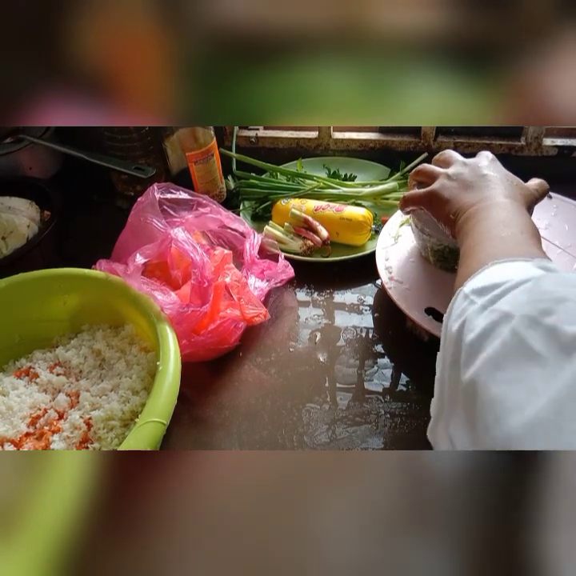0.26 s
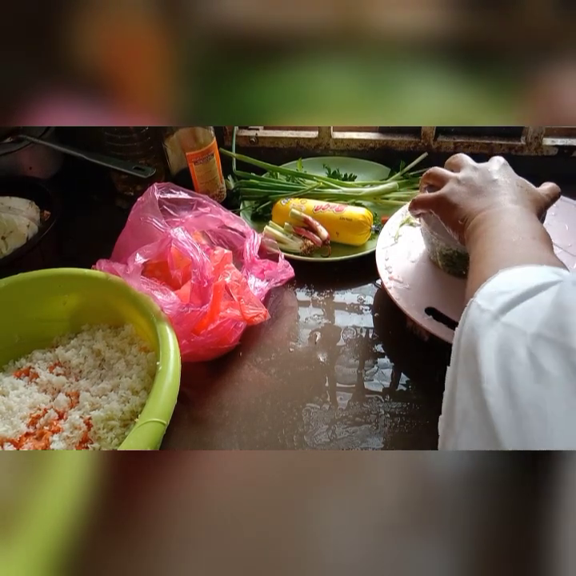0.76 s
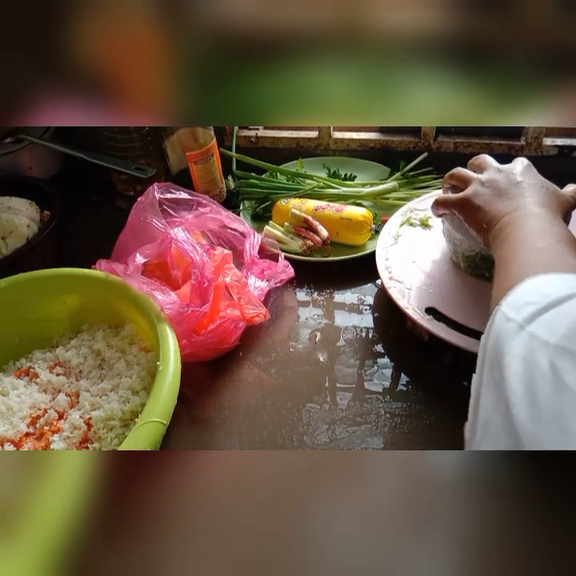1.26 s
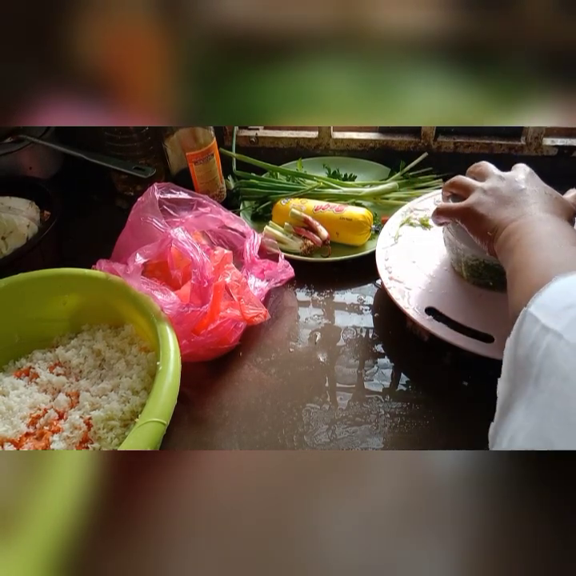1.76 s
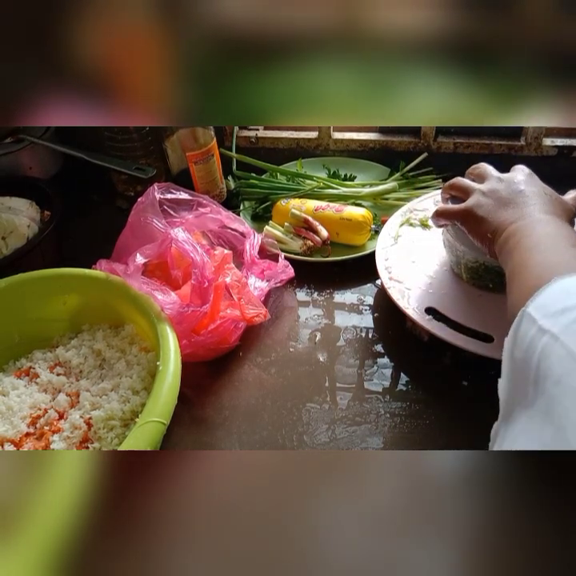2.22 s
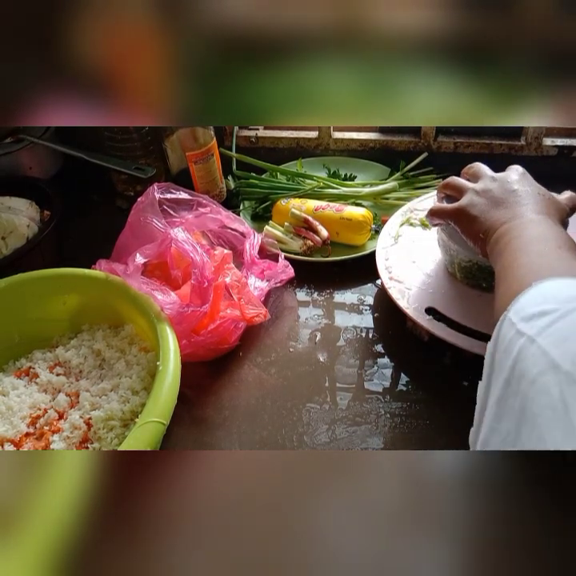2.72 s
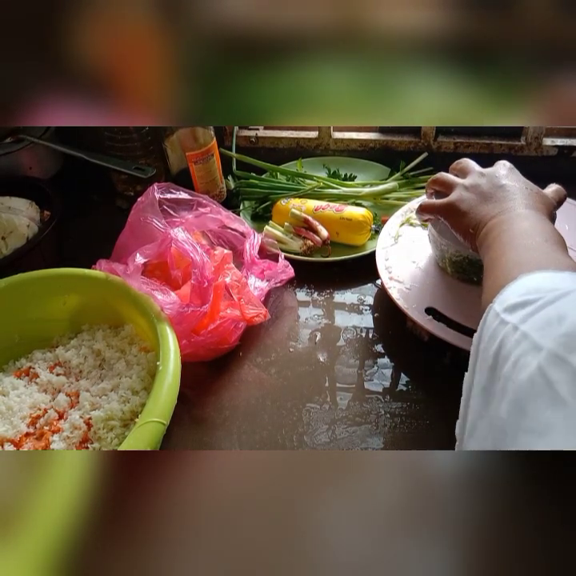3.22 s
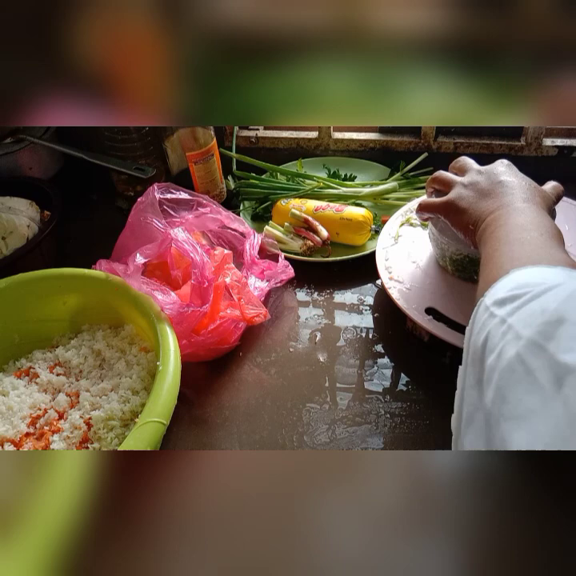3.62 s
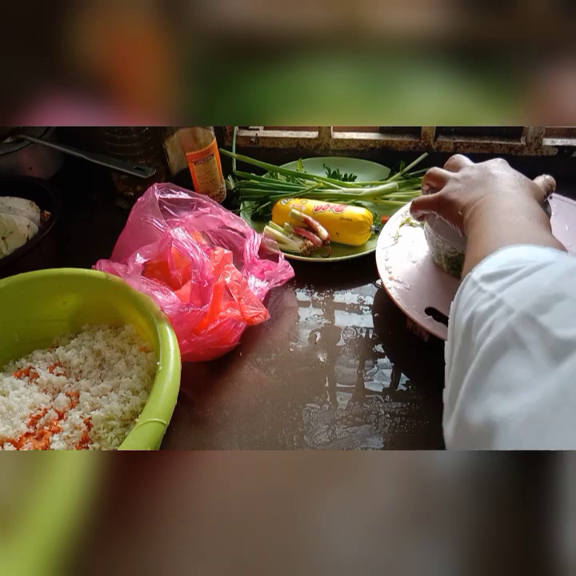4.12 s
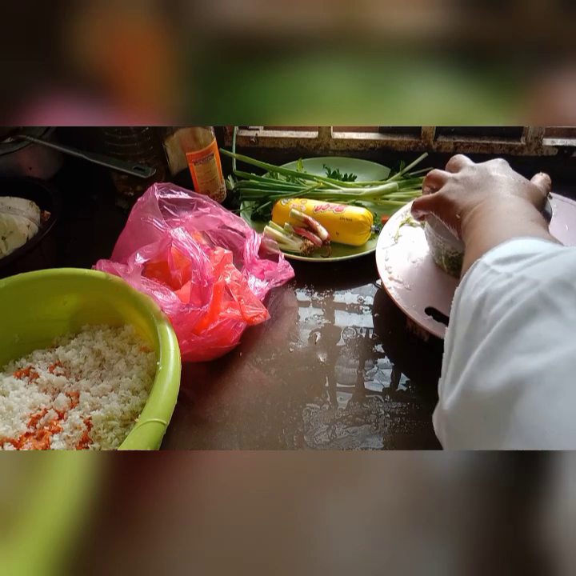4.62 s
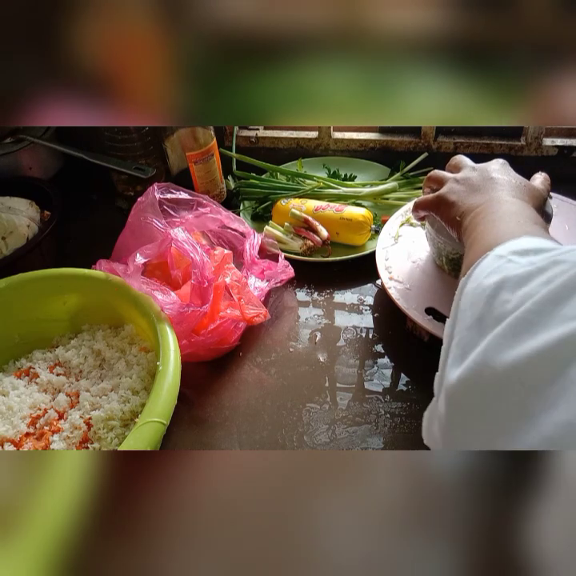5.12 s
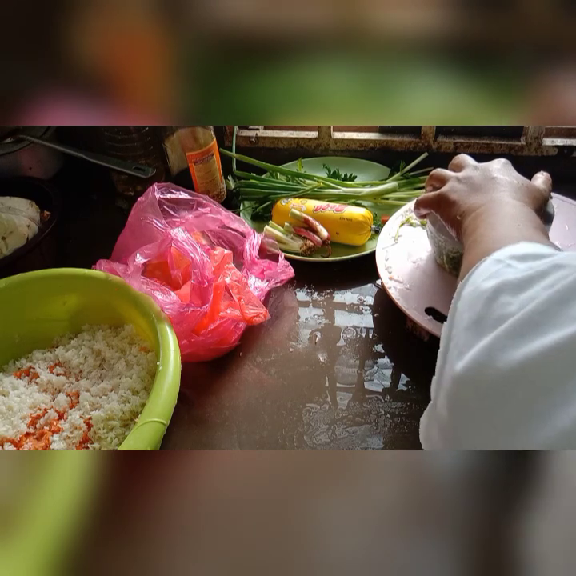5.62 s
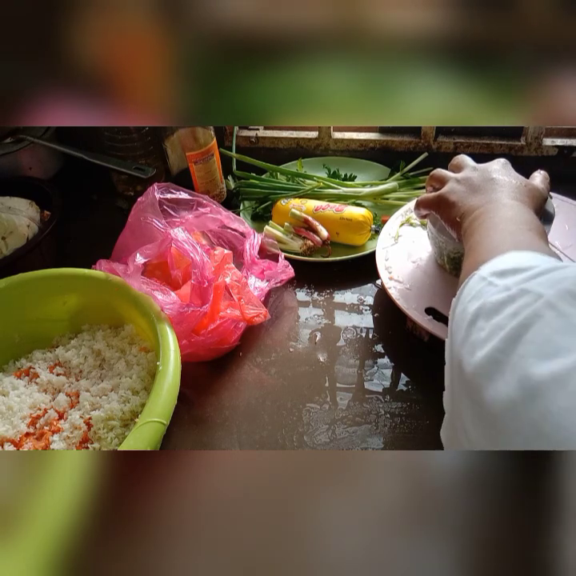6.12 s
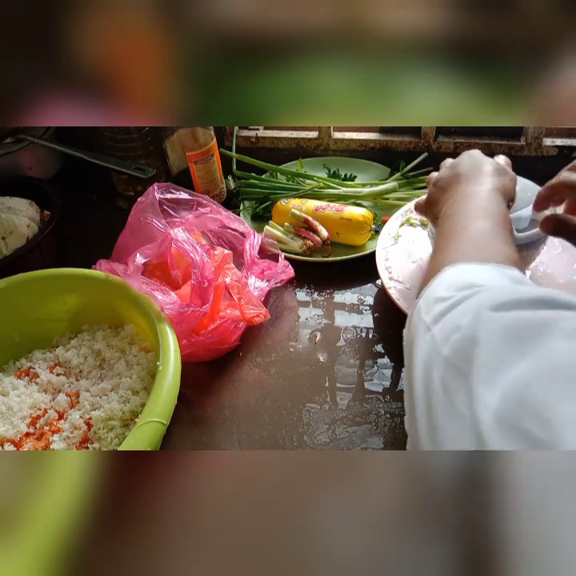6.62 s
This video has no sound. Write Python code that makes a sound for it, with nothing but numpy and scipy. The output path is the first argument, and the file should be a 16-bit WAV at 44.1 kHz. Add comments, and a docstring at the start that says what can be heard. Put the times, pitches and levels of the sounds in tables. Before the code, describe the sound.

From the start, a hand-pressed chopper works through herbs on a plastic tray, close by in a kitchen with a short echo. There are thirteen pushes, about two a second. Each one crunches and snaps stalks, ringing the cup and drumming on the tray. About a quarter second after each push, the steel blades return with a bright rasp and a thin, high ring, sometimes catching with a click. The tray bumps now and then, most clearly near 3 and 5.6 seconds. The hollow under the cup gives faint, brief gliding tones around 1.5, 2 and 4.2 seconds. A steady sizzle of bursting bubbles runs underneath throughout, with occasional tiny spits. The last push comes at about 6 seconds, followed by a slower, softer scrape. At about 6.6 seconds the chopper is lifted with a short, sharp plastic clatter, leaving the sizzle.

```python
"""A kitchen: a hand chopper is worked to and fro on a plastic tray, two strokes a second.
Each push crunches through herbs, ringing the chopper's cup and drumming on the tray; on each return
the steel blades rasp and ring. The hollow under the cup sings now and then as its rim shifts.
Bursting bubbles sizzle steadily nearby. At the end the chopper is lifted off with a short clatter."""
import sys
import numpy as np
from scipy import signal
from scipy.fft import rfft, irfft
from scipy.io import wavfile

SR = 44100
rng = np.random.default_rng(int(sys.argv[2]) if len(sys.argv) > 2 else 0)


def log_audio(samples):
    """Write samples as a 16-bit WAV file to the path given in sys.argv[1]."""
    # one column per channel
    frames = np.atleast_2d(samples).T
    # limit to full scale, then quantise
    limited = np.clip(frames, -1, 1)
    pcm = np.round(limited * 32767).astype(np.int16)
    wavfile.write(sys.argv[1], SR, pcm)


N = 302526
TAPS = 4096  # impulse response length


def undb(db):
    """Decibels to gain."""
    return 10 ** (np.asarray(db) / 20)


def body(modes, colour=None):
    """Unit-energy impulse response of damped resonances over a broad spectrum."""
    hz = np.arange(TAPS // 2 + 1) * SR / TAPS + 1
    power = sum(undb(db) ** 2 / (1 + 2 * ((hz - f) / width) ** 2) ** 2 for f, width, db in modes)
    if colour is not None:
        colour_hz, colour_db = np.transpose(colour)
        power = power + undb(np.interp(np.log(hz), np.log(colour_hz), colour_db)) ** 2
    # minimum phase: the ring follows the blow
    cepstrum = irfft(np.log(power))[:TAPS // 2]
    cepstrum[0] *= 0.5
    response = irfft(np.exp(rfft(cepstrum, TAPS)))
    return response / np.linalg.norm(response)


def ring(force, response):
    """Drive a body with a force."""
    return signal.fftconvolve(force, response)[:N]


def scatter(x, spread_s):
    """Three short all-pass round trips smear each contact without changing its colour."""
    response = 1
    for lag_s in spread_s * np.array([0.17, 0.31, 0.52]):
        trip = np.exp(-2j * np.pi * np.arange(TAPS // 2 + 1) * np.round(lag_s * SR) / TAPS)
        response = response * (trip - 0.5) / (1 - 0.5 * trip)
    return ring(x, irfft(response))


def walk(per_s):
    """Random wander, spread near 1."""
    knots = rng.standard_normal(N // 100)
    return np.interp(np.arange(N) / SR * per_s, np.arange(len(knots)), knots)


def flutter(per_s, depth_db):
    """Randomly wandering gain."""
    return undb(depth_db * walk(per_s))


def grains(per_s, spread_db):
    """Tiny impulses of random time, size and sign; rms 1."""
    size = undb(spread_db * np.clip(rng.standard_normal(N), -2, 2)) * rng.choice([-1, 1], N)
    x = size * (rng.random(N) < per_s / SR)
    return x / x.std()


def blows(rows, crumble_s, crumble):
    """A sharp force at each (time [s], level [dB]), trailed by a crumble of smaller contacts."""
    force, t = np.zeros(N + TAPS), np.arange(TAPS) / SR
    for time_s, db in rows:
        tail = rng.standard_normal(TAPS) * np.exp(-t / crumble_s)
        blow = crumble * tail / np.linalg.norm(tail)
        blow[0] += 1
        start = int(time_s * SR)
        force[start:start + TAPS] += undb(db) * blow
    return force[:N]


def latest_stroke(strokes, levels_db):
    """Per sample: age [s], level [dB] and remaining columns of the latest stroke."""
    t = np.arange(N) / SR
    starts_s, *columns = np.transpose(strokes)
    row = np.maximum(np.searchsorted(starts_s, t) - 1, 0)
    return t - starts_s[row], levels_db[row], *(column[row] for column in columns)


# pushes through the herbs: (start [s], time to full pressure [s], swell [dB], crunch [dB], judder [dB])
PUSHES = [(-0.005, 0.15, 5.5, -20.5, -27), (0.487, .14, 7.5, -22, -24), (.972, 0.15, 14, -20.5, -24.5),
          (1.448, 0.17, 8.5, -24, -28.5), (1.976, 0.14, 21.5, -20, -28.5), (2.498, 0.15, 7, -22, -29.5),
          (2.951, .13, 15.5, -18.5, -25.5), (3.447, 0.13, 10, -18.5, -27), (3.953, 0.11, 7.5, -22, -29.5),
          (4.408, 0.15, 14.5, -22.5, -25.5), (4.956, 0.12, 6.5, -20.5, -26), (5.472, 0.16, 9, -23, -29),
          (5.958, 0.14, 1.5, -24.5, -29)]


def pushes(levels_db, attack_s=0.018, fall_db_per_s=102):
    """Push gain: the blades bite, pressure swells to its peak, the herbs give way."""
    age_s, db, press_s, swell_db, *_ = latest_stroke(PUSHES, levels_db)
    shape_db = np.minimum(swell_db * (age_s / press_s - 1), -fall_db_per_s * (age_s - press_s))
    return np.clip(age_s / attack_s, 0, 1) * undb(db + shape_db)


# return strokes, longer as the hand slows:
# (start [s], length [s], rasp [dB], steel ring [dB], cup rattle [dB], judder [dB])
RETURNS = [(0.247, 0.17, -30, -22, -28, -35.5), (0.752, 0.17, -27.5, -20, -27, -33.5),
           (1.221, 0.17, -25.5, -22, -28.5, -35), (1.726, 0.17, -28, -21, -28, -34),
           (2.222, 0.19, -27.5, -22.5, -30, -33), (2.729, .15, -24, -19, -26.5, -36),
           (3.207, 0.16, -26, -19.5, -27.5, -37), (3.673, 0.18, -25.5, -20, -33, -35),
           (4.168, 0.17, -24, -26.5, -29, -35), (4.671, .18, -27, -25, -28.5, -34.5),
           (5.207, 0.2, -30.5, -27, -29.5, -38.5), (5.731, 0.18, -28.5, -26, -30.5, -39),
           (6.24, 0.27, -30, -32, -37.5, -45.5)]


def returns(levels_db, fade_db, attack_share=0.19, hold_share=0.29, stop_db_per_s=236):
    """Return gain: quick start, short hold, fade, then a fast decay as the hand stops."""
    age_s, db, length_s, *_ = latest_stroke(RETURNS, levels_db)
    progress = age_s / length_s
    faded_db = fade_db * np.maximum(progress - hold_share, 0)
    stopped_db = stop_db_per_s * np.maximum(age_s - length_s, 0)
    return np.clip(progress / attack_share, 0, 1) * undb(db - faded_db - stopped_db)


def held(level_db, lift_s=6.52):
    """Constant gain until the hand takes its weight off the chopper."""
    return undb(level_db) * (np.arange(N) / SR < lift_s)


def gripped(force, modes, shift):
    """A body whose resonances slide between slack and tight as the grip changes."""
    grip = np.clip(walk(per_s=5), -1, 1)
    out = 0
    for step in (-1, 0, 1):
        shifted = [(hz * (1 + shift * step), width, db) for hz, width, db in modes]
        share = np.maximum(1 - abs(grip - step), 0)
        out = out + ring(force * share, body(shifted))
    return out


# thick stalks snapping; tray rocking onto the counter: (time [s], level [dB])
STALK_SNAPS = [(0.038, -6), (0.092, -5), (0.112, 2), (0.173, 1), (0.547, -2), (0.575, -3.5), (0.64, 0),
               (1.038, -3), (1.063, -2), (1.083, -7), (1.555, -5), (1.578, -2), (2.069, -4), (2.117, 0),
               (2.603, 2.5), (3.018, -7), (3.05, -1), (3.482, 1), (3.521, -3.5), (3.583, -7), (4.008, -2.5),
               (4.078, -3), (4.519, -4), (5.033, -2), (5.058, -10), (5.082, -4), (5.527, -0.5), (5.619, -2),
               (5.979, -4), (6.023, -2.5), (6.056, -10), (6.083, -6.5)]
TRAY_BUMPS = [(0.983, -12.5), (2.512, -18), (3.018, -5), (3.449, -12), (5.604, -6), (5.985, -14),
              (6.626, -26)]
# resonances of cup, cracking stalks, wet leaves and tray: (frequency [Hz], width [Hz], level [dB])
CUP_MODES = [(717, 87, 2), (856, 110, -5), (1160, 102, 4), (1297, 77, 1), (1444, 77, 6), (1726, 170, -2.5),
             (2080, 420, -9)]
CRACK_MODES = [(760, 170, 1), (1070, 280, -7.5), (1545, 360, -1), (3050, 1100, -1), (5570, 800, -5)]
JUICE_MODES = [(7100, 3200, 3), (11000, 6000, -12)]
TRAY_MODES = [(122, 27, -18.5), (216.7, 35, -2.5), (273.8, 27, 5), (365, 48, -3), (500, 166, -9.5)]
# broad spectra under the crack and tray resonances: (frequency [Hz], level [dB])
CRACK_COLOUR = [(100, -18), (500, -1.5), (1000, -2), (2000, -6), (4000, -27), (7000, -12), (10000, -20),
                (16000, -54)]
TRAY_COLOUR = [(25, -46), (60, -59), (100, -14), (180, -8), (500, -7), (750, -31), (3000, -72)]


def chopping():
    """Breaking stalks ring the cup; the same jolts and the hand's judder drum on the tray."""
    *_, crunch_db, push_judder_db = np.transpose(PUSHES)
    *_, rattle_db, return_judder_db = np.transpose(RETURNS)
    settling = held(-49)  # herbs under the resting blades
    crunch = pushes(crunch_db) + returns(rattle_db, fade_db=11.5) + settling
    crunch *= flutter(per_s=45, depth_db=1.24)
    judder = pushes(push_judder_db) + returns(return_judder_db, fade_db=11.5)
    judder *= flutter(per_s=35, depth_db=2.5)
    fractures = grains(per_s=1000, spread_db=3.5)
    snaps = blows(STALK_SNAPS, crumble_s=0.0032, crumble=0.91)
    cup_force = undb(-4) * fractures * crunch + snaps
    # the crack grows faster with pressure than the cup's ring
    crack_force = undb(10.5) * grains(per_s=700, spread_db=3.5) * crunch ** 1.523 + undb(1.5) * snaps
    jolts = (fractures + grains(per_s=1200, spread_db=2)) * judder
    bumps = blows(TRAY_BUMPS, crumble_s=0.0056, crumble=0.45)
    tray_force = undb(-5) * jolts + undb(-4.5) * snaps + undb(7) * bumps
    cup = gripped(cup_force, CUP_MODES, shift=0.033)
    crack = ring(crack_force, body(CRACK_MODES, CRACK_COLOUR))
    juice = undb(-23.5) * ring(grains(per_s=91, spread_db=8) * crunch, body(JUICE_MODES))
    tray = ring(tray_force, body(TRAY_MODES, TRAY_COLOUR))
    return scatter(cup + crack + juice, spread_s=0.0017) + tray


# bubble resonances: (frequency [Hz], width [Hz], level [dB])
SIZZLE_MODES = [(3164, 430, 3.5), (3443, 250, 4), (5200, 1130, -4)]
# broad fizz spectrum: (frequency [Hz], level [dB])
SIZZLE_COLOUR = [(30, -54), (180, -23), (600, -32), (1050, -59), (1400, -5), (1800, -6), (2600, -2.5),
                 (4200, -4), (5800, -6.5), (7000, -10.5), (10000, -22), (14000, -27)]


def sizzle():
    """A dense fizz of bursting bubbles, with brighter beads that flare up."""
    bursts = grains(per_s=9000, spread_db=3.5) * flutter(per_s=22, depth_db=1.5)
    flares = grains(per_s=480, spread_db=4.5) * flutter(per_s=30, depth_db=2.5)
    fizz = undb(-27.5) * ring(bursts, body(SIZZLE_MODES, SIZZLE_COLOUR))
    beads = undb(-31.5) * ring(flares, body(SIZZLE_MODES))
    return scatter(fizz + beads, spread_s=0.0011)


def stick_slip(per_s, jitter, spread_db):
    """A train of slips at loosely even intervals; rms 1."""
    gap_draw, size_draw = rng.standard_normal((N // 40, 2)).T
    at = (np.cumsum(np.exp(jitter * gap_draw)) * SR / per_s).astype(int)
    x = np.bincount(at[at < N], undb(-spread_db * size_draw[at < N]), N)
    return x / x.std()


# a blade catching its guide: (time [s], level [dB])
BLADE_CATCHES = [(0.183, -18), (0.2653, -14), (0.3391, -22), (0.6519, -22), (0.7574, -10.5), (1.1653, -19),
                 (1.2087, -20), (1.2354, -12), (1.4526, -17.5), (1.7458, -8.5), (1.866, -21), (2.375, -16),
                 (2.7693, -13), (3.232, -11), (5.9778, -17)]
# steel resonances, rasping and ringing: (frequency [Hz], width [Hz], level [dB])
RASP_MODES = [(4460, 360, -17), (7650, 150, 7), (9700, 220, -6), (11600, 230, 3), (14600, 290, -11),
              (15500, 400, -0.5)]
RING_MODES = [(8200, 200, -13), (8577, 300, -3), (9740, 170, -15), (11910, 230, -13.5), (15500, 160, -17)]
# broad rasp spectrum: (frequency [Hz], level [dB])
RASP_COLOUR = [(950, -41), (1500, 0.5), (2200, 6), (4000, 6.5), (6000, 4.5), (9000, -1), (13500, -1),
               (16000, -1)]


def blades():
    """Steel rasps along its guide, faintly even at rest; coarser slips and catches make it ring."""
    _, _, rasp_db, ring_db, *_ = np.transpose(RETURNS)
    *_, crunch_db, _ = np.transpose(PUSHES)
    pressed = pushes(crunch_db - 22.5)
    rubbing = returns(rasp_db, fade_db=13) + pressed + held(-46)
    slipping = returns(ring_db, fade_db=17.5) + undb(-5) * pressed + held(-43)
    friction = grains(per_s=8300, spread_db=0) * flutter(per_s=120, depth_db=2.7) * rubbing
    slips = stick_slip(per_s=330, jitter=0.5, spread_db=1) * flutter(per_s=36, depth_db=3.5) * slipping
    catches = blows(BLADE_CATCHES, crumble_s=0.012, crumble=1.4)
    rasp = undb(3) * ring(friction, body(RASP_MODES, RASP_COLOUR))
    steel = ring(undb(-2.5) * slips + undb(12.5) * catches, body(RING_MODES))
    return rasp + scatter(steel, spread_s=0.0008)


# single spits in the sizzle: (time [s], level [dB], pitch [Hz])
SPITS = [(1.2077, -14.5, 3440), (1.9505, -20, 3500), (2.0817, -15, 3230), (2.4399, -17, 3250),
         (2.4638, -17, 3000), (3.0934, -13, 3310), (4.7421, -12, 3250), (4.8554, -20, 3220),
         (4.9721, -17, 3600), (5.5418, -24, 3290), (6.7296, -19.5, 3510)]


def spits(rise_s=0.0008, decay_s=0.0013):
    """Each loud spit is a briefly ringing damped tone."""
    out, t = np.zeros(N + TAPS), np.arange(TAPS) / SR
    envelope = (1 - np.exp(-t / rise_s)) * np.exp(-t / decay_s)
    envelope /= envelope.max()
    for time_s, db, hz in SPITS:
        start = int(time_s * SR)
        out[start:start + TAPS] += undb(db + 1) * envelope * np.sin(2 * np.pi * hz * t)
    return out[:N]


# air resonance under the cup: (start [s], length [s], from [Hz], to [Hz], level [dB])
HOLLOW_GLIDES = [(1.454, .07, 1560, 1156, -30.5), (1.977, 0.079, 1420, 1060, -33),
                 (2.951, 0.021, 1400, 1220, -31), (4.117, 0.31, 1302, 1227, -37),
                 (4.195, 0.11, 2277, 2230, -31), (6.249, 0.13, 233, 347, -51), (6.349, .16, 400, 498, -49),
                 (6.361, 0.16, 738, 722, -44.5), (6.599, 0.059, 1394, 1024, -26),
                 (6.635, .11, 964, 790, -43)]


def hollow(width_hz=230):
    """Rubbing excites an air resonance that glides with the gap under the rim."""
    out = np.zeros(N + SR)
    lowpass = signal.butter(2, width_hz / 2, fs=SR, output="sos")
    for time_s, length_s, from_hz, to_hz, db in HOLLOW_GLIDES:
        progress = np.linspace(0, 1, int(length_s * SR))
        noise = rng.standard_normal(SR) + 1j * rng.standard_normal(SR)
        rub = signal.sosfilt(lowpass, noise)[-len(progress):]
        phase = 2 * np.pi * np.cumsum(from_hz + (to_hz - from_hz) * progress) / SR
        tone = np.real(rub * np.exp(1j * phase)) * np.sin(np.pi * np.sqrt(progress))
        start = int(time_s * SR)
        out[start:start + len(tone)] += undb(db) * tone / tone.std()
    return out[:N]


# plastic rim knocks: (time [s], level [dB])
RIM_KNOCKS = [(6.5884, 4), (6.6023, -2), (6.6097, 3), (6.6165, 1), (6.6266, -6)]
# plastic resonances: (frequency [Hz], width [Hz], level [dB])
KNOCK_MODES = [(1580, 260, 3.5), (1980, 250, 1), (2520, 380, 0), (3200, 500, -2), (5140, 650, 1),
               (5900, 570, 0.5), (8500, 600, -15)]
# broad knock spectrum: (frequency [Hz], level [dB])
KNOCK_COLOUR = [(100, -51), (500, -29), (1200, -24), (4000, -15), (6500, -14), (9000, -17), (16000, -28)]


def lifting():
    """The rim clatters on the tray as the chopper is lifted."""
    force = blows(RIM_KNOCKS, crumble_s=0.016, crumble=1.68)
    clatter = ring(force, body(KNOCK_MODES, KNOCK_COLOUR))
    return undb(1.5) * scatter(clatter, spread_s=0.0012)


def kitchen(x, t60_s=0.22, echo_db=-10.5, predelay_s=0.003):
    """Counter and walls return a short, dense echo."""
    t = np.arange(SR // 2) / SR
    tail = rng.standard_normal(len(t)) * undb(-60 * t / t60_s) * (t > predelay_s)
    return x + undb(echo_db) * ring(x, tail / np.linalg.norm(tail))


def scene():
    """All sources in one room, identical in both channels."""
    mono = kitchen(chopping() + blades() + hollow() + lifting() + sizzle() + spits())
    return np.array([mono, mono])


def record(dry):
    """Bass cut, soft peak clipping, steep treble cut."""
    bottom_hz, top_hz, drive = 60, 15600, 1.2
    x = signal.sosfilt(signal.butter(2, bottom_hz, "high", fs=SR, output="sos"), dry)
    x = np.tanh(drive * x) / drive
    return signal.sosfilt(signal.ellip(10, 0.2, 80, top_hz, fs=SR, output="sos"), x)


dry = scene()
out = record(dry)
log_audio(out)
```